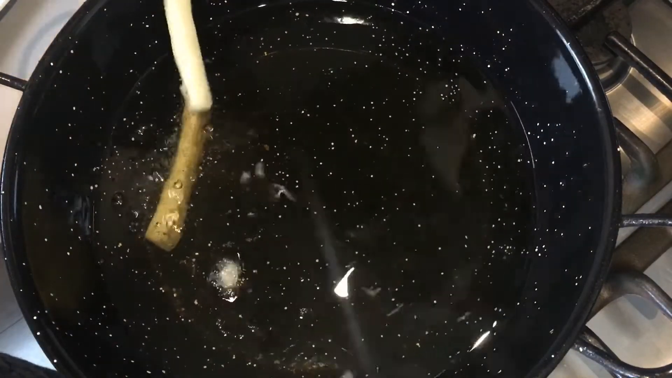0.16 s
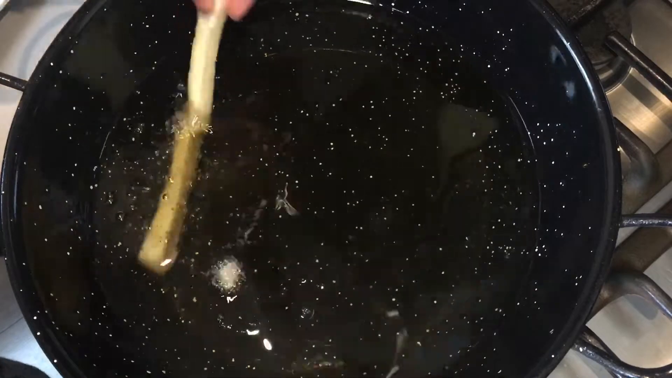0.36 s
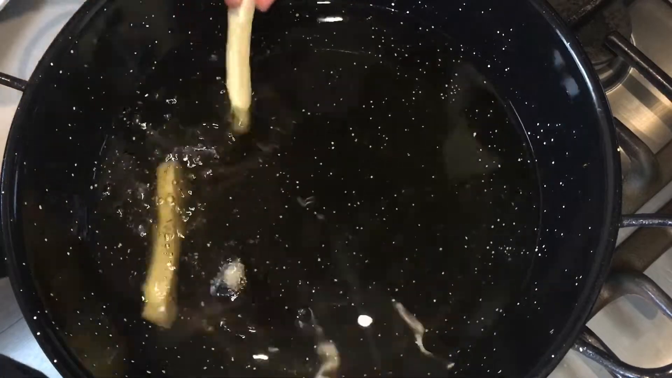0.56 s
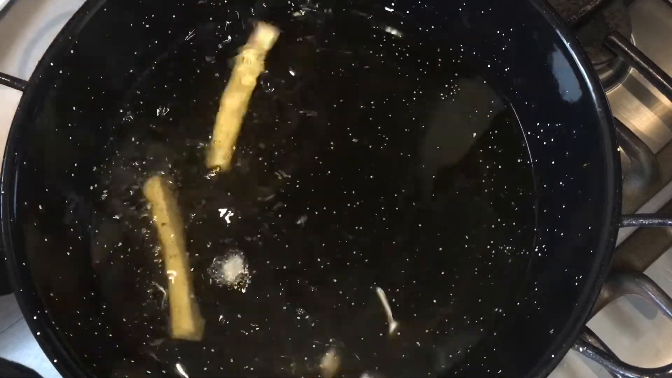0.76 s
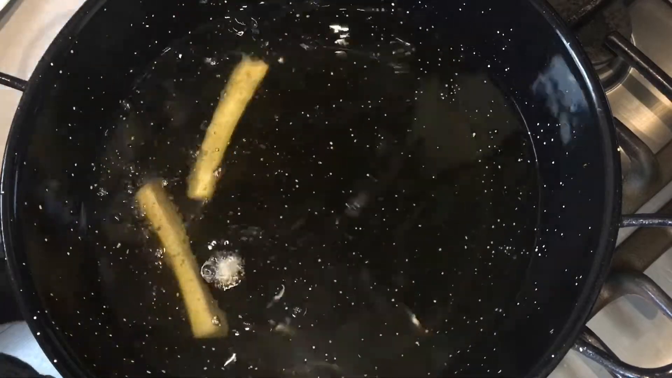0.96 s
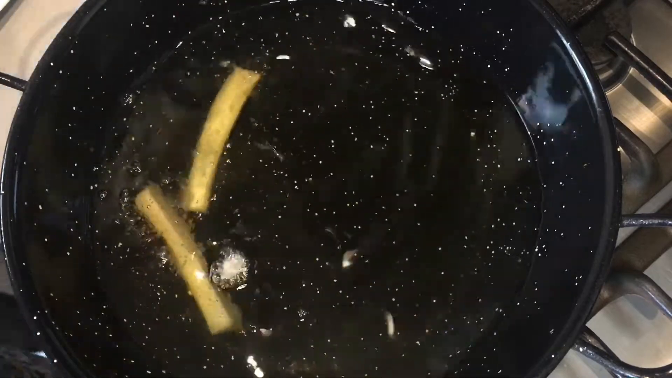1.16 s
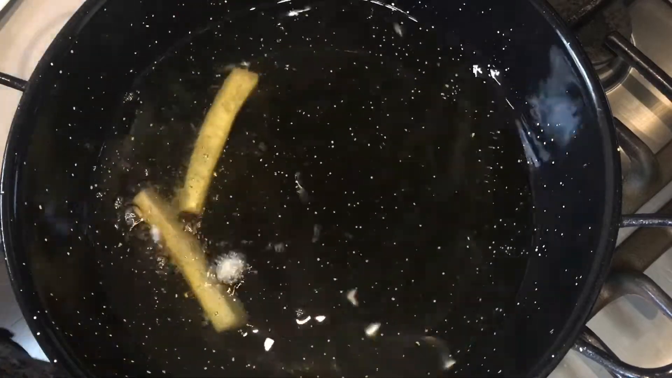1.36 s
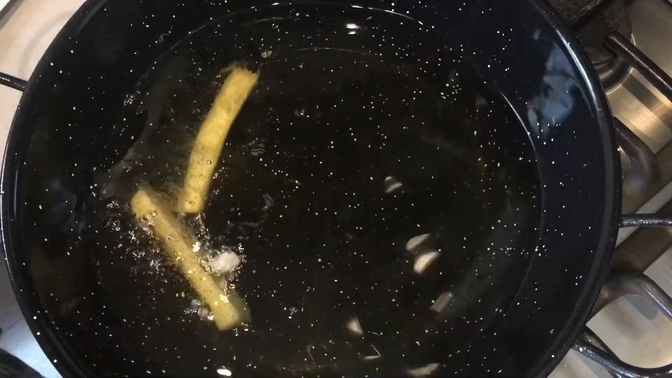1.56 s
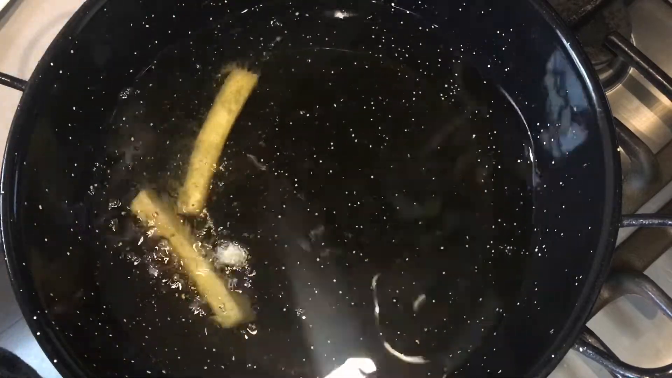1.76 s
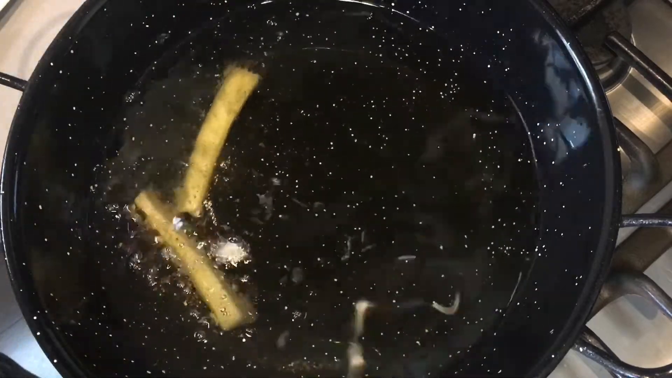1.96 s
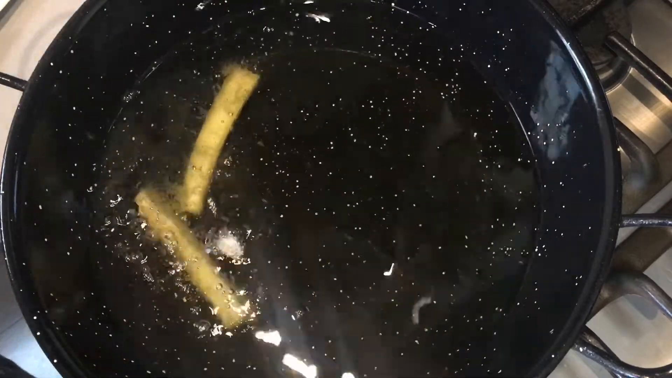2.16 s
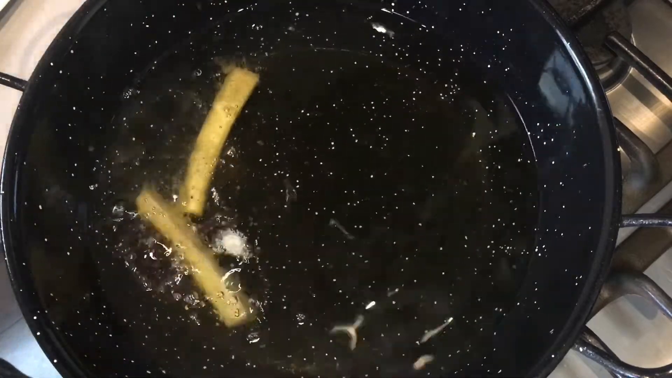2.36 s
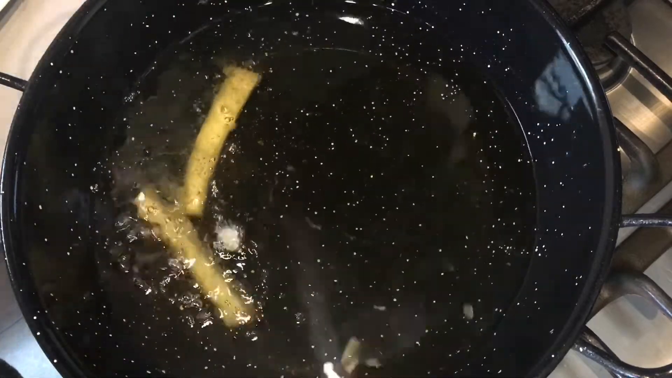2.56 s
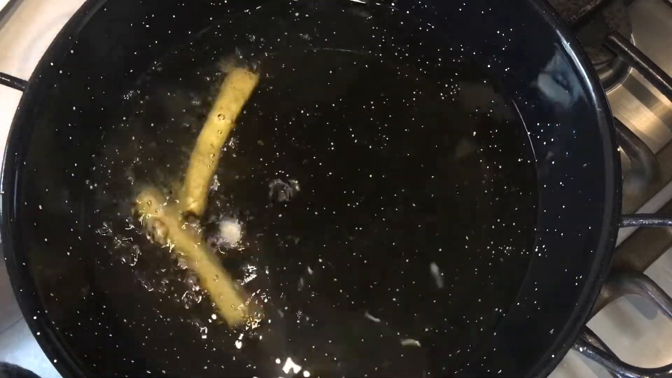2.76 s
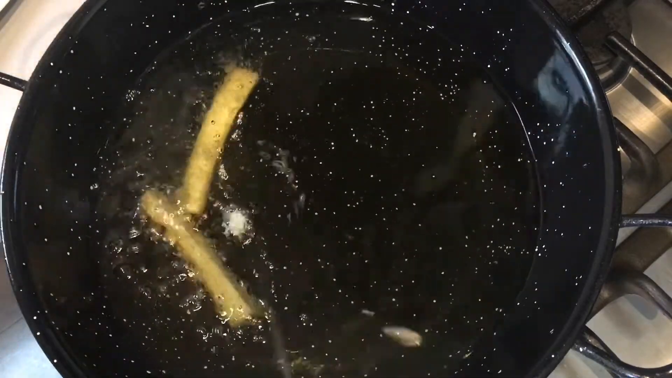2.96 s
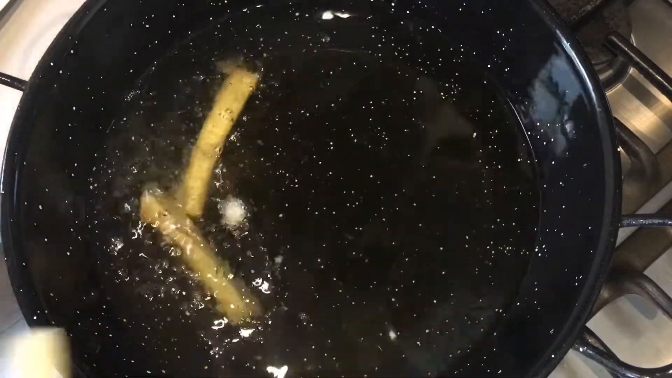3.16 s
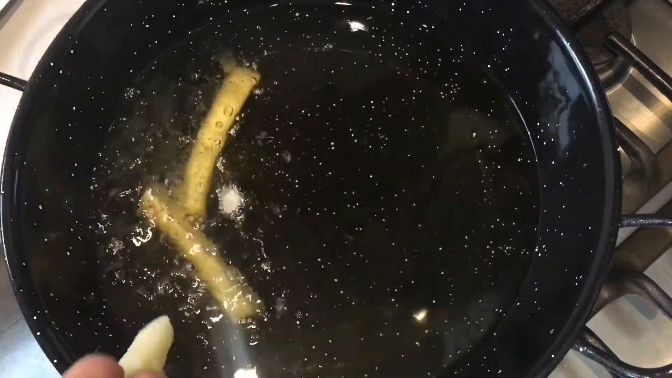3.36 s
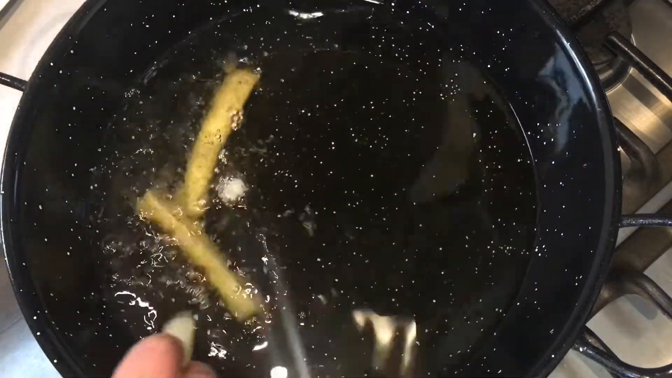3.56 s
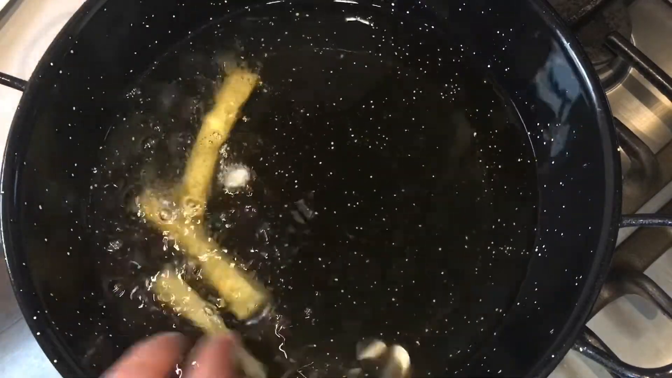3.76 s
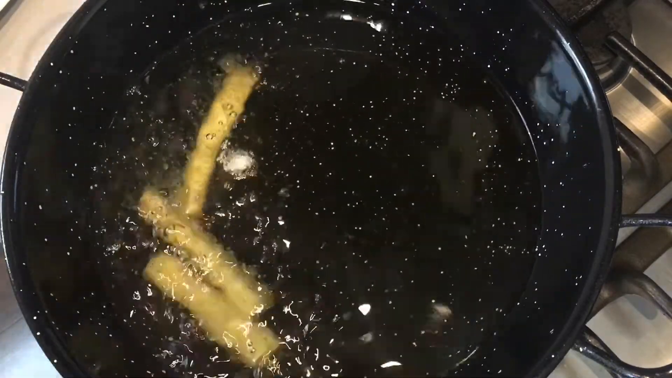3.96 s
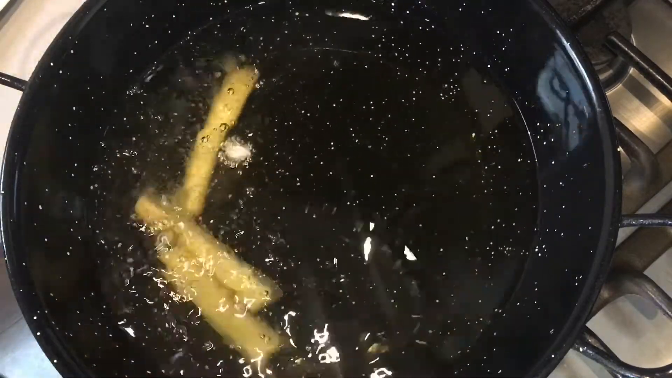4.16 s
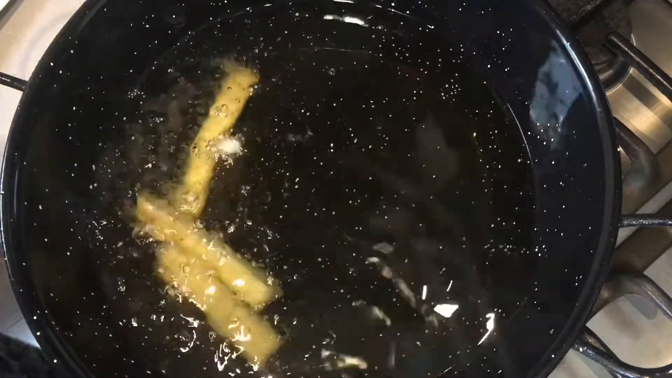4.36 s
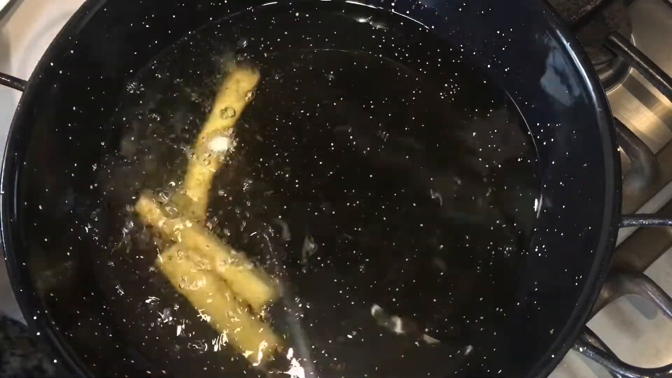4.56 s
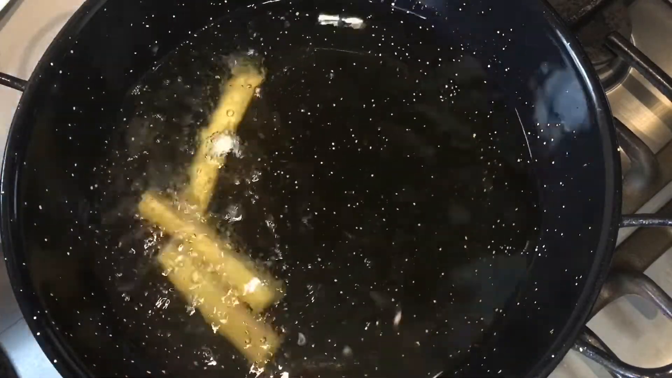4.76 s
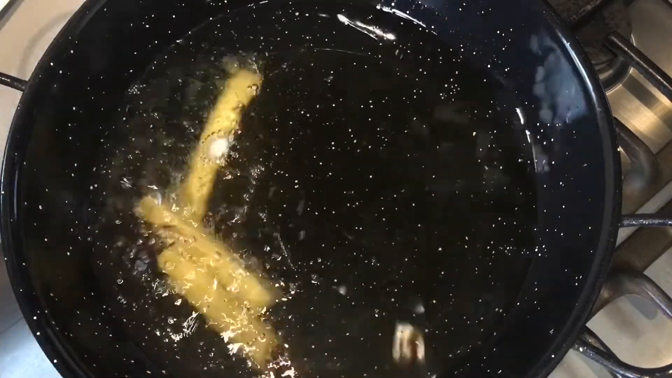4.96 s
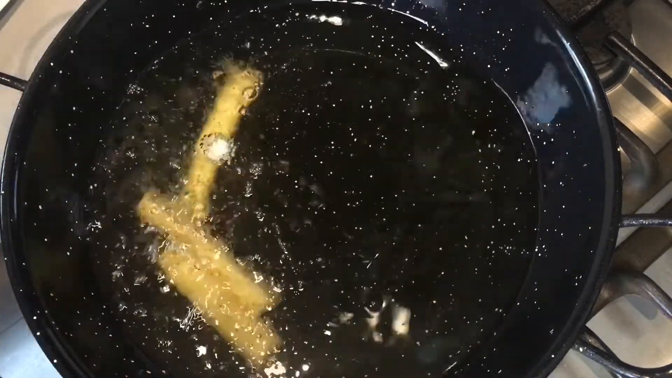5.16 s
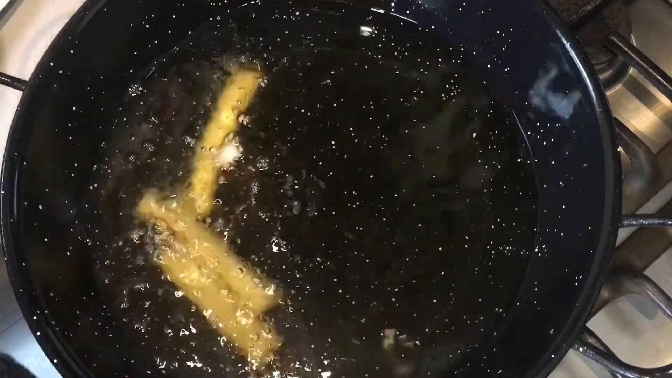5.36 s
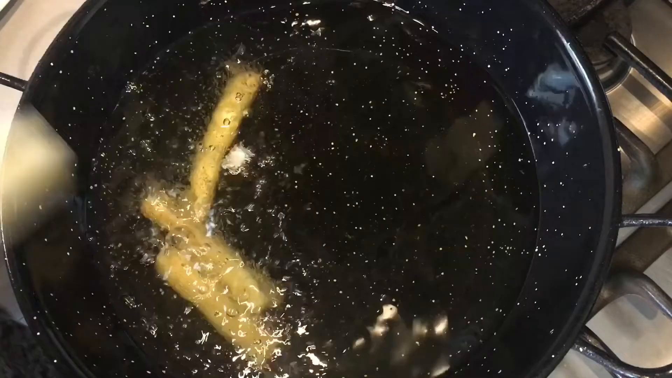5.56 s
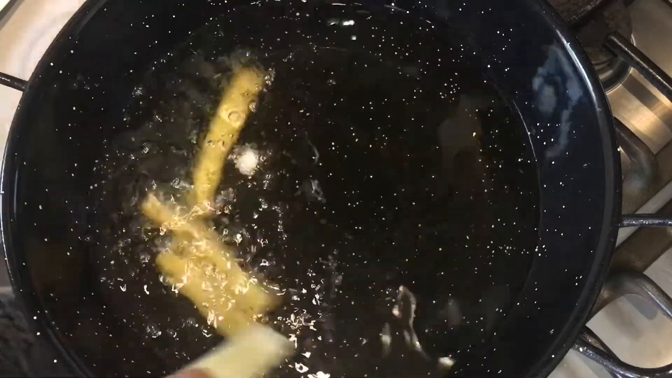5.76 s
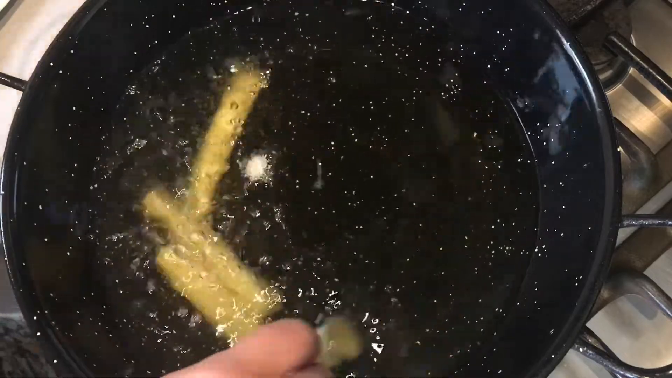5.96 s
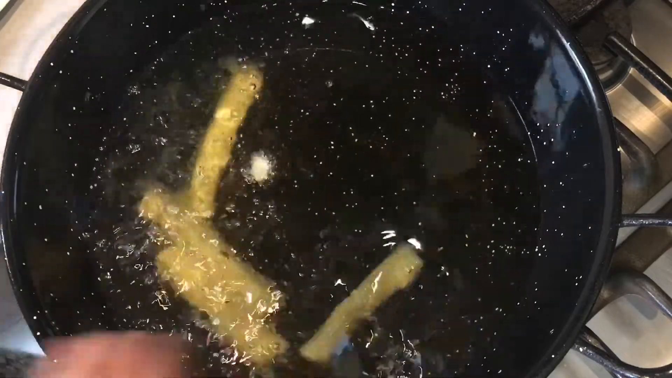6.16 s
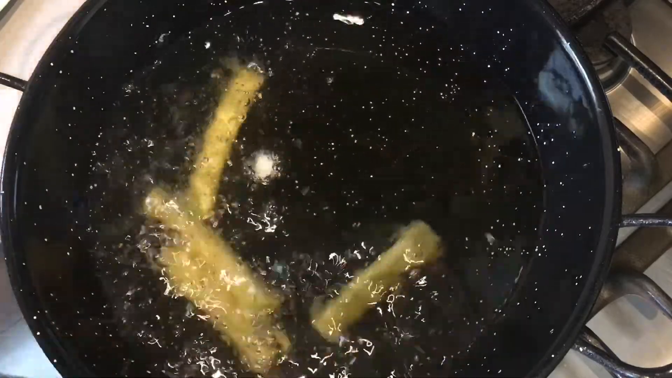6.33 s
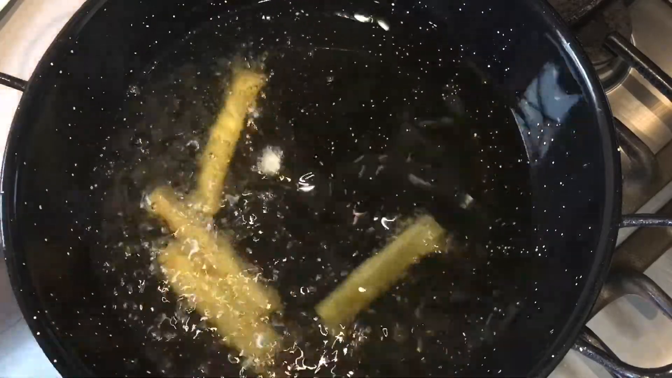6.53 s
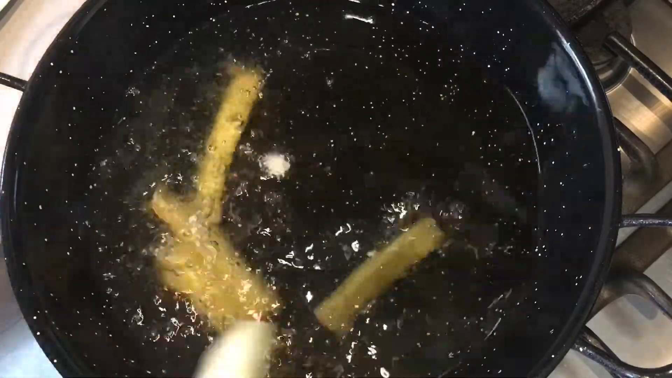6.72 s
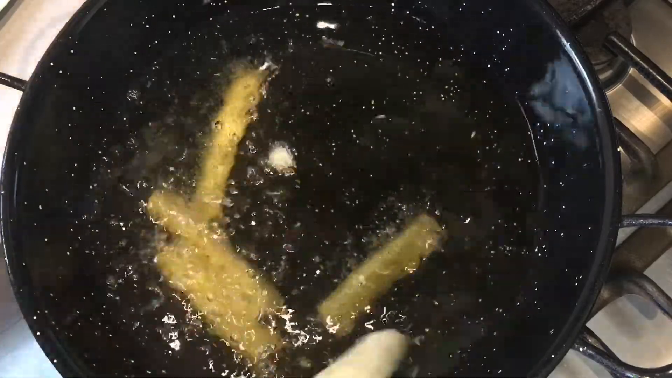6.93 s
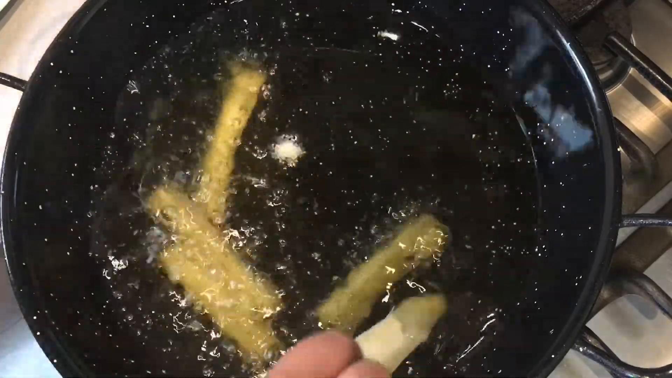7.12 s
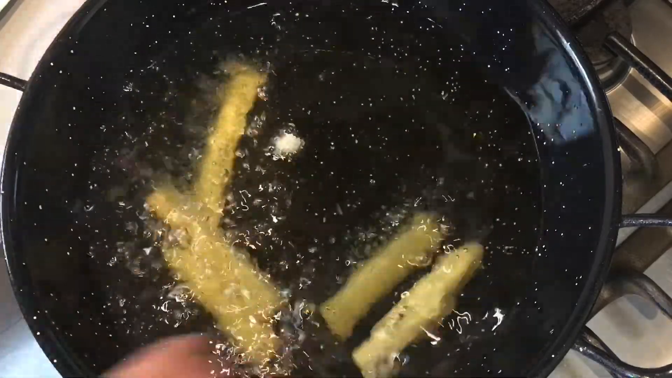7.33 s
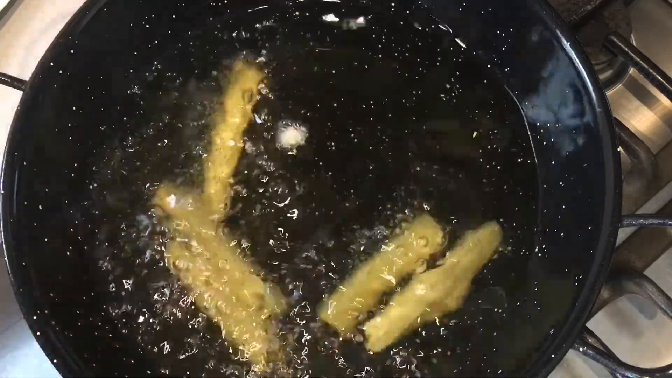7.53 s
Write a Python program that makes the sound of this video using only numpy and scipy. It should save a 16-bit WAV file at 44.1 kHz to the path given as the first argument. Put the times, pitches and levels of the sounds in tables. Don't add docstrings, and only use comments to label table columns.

```python
import sys
import numpy as np
from scipy import signal
from scipy.fft import rfft, irfft
from scipy.io import wavfile

SR = 44100
rng = np.random.default_rng(int(sys.argv[2]) if len(sys.argv) > 2 else 0)


def magnitude_from_level(level_db):
    exponent = np.asarray(level_db, float) / 20
    return 10 ** exponent


def output_pcm(signal):
    pcm = np.clip(np.atleast_2d(signal).T, -1, 1) * 32767
    wavfile.write(sys.argv[1], SR, np.round(pcm).astype(np.int16))


N = 334719

# f/Hz, level per Hz/dB
AIR_HISS = [(12, -46), (20, -31.5), (98, -1.5), (126, -12.5), (167, -20), (481, -25.5), (841, -15.5),
            (1690, -33.5), (2170, -31), (5020, -30.5), (5930, -22), (7410, -54), (8060, -29.5),
            (13700, -27), (15800, -34.5)]
# f/Hz, width/Hz, level/dB
JET_WHISTLES = [(717, 76, 8.5), (879, 117, 4), (1045, 59, 8.5), (1125.5, 60, 11.5), (1394, 147, 7),
                (2190, 160, 4.5), (3150, 620, -3.5), (3830, 160, 4.5), (4600, 200, 1), (5290, 82, -1.5),
                (6050, 154, 10), (6790, 180, -0.5), (8024, 87, 5), (9200, 85, -12), (10670, 220, -2.5),
                (11600, 170, -1), (13840, 350, -1)]
# f/Hz, width/Hz, level/dB
FLAME_WHISTLES = [(836, 50, -61), (919, 35, -60.5)]
# t/s, level/dB
FLAME_SWELL = [
    (0, -1),
    (2.1, -4),
    (2.6, 1.5),
    (3.0, 3),
    (4.3, 2.5),
    (4.7, -1.5),
    (5.7, -3),
    (6.0, 0.5),
    (7.59, 4.5),
]
# f/Hz, width/Hz, level/dB
PAN_MODES = [(3240, 120, 0), (3963, 47, 1.5), (4560, 170, -2.5), (5285, 205, 0.5), (5850, 650, -7),
             (6640, 122, 4), (8200, 150, -40), (9730, 140, -1), (11600, 430, -29), (13700, 1200, -14)]
# t/s, level/dB
SIZZLE_VIGOUR = [(0, -60), (.4, -54), (.72, -48), (.9, -50), (1.11, -42), (1.3, -47.5), (2.1, -47.5),
                 (3.78, -49), (3.9, -37.5), (4.07, -46.5), (4.5, -51), (6.0, -51), (6.07, -39), (6.29, -44),
                 (6.38, -33), (6.62, -34), (6.8, -39.5), (7.59, -43)]
# t/s, level/dB
BUBBLE_ROLL = [
    (0, -55.5),
    (4.1, -51.5),
    (5.7, -54.5),
    (6.41, -43.5),
    (6.49, -35.5),
    (6.62, -39),
    (6.98, -39.5),
    (7.25, -42),
    (7.59, -46),
]
# t/s, level/dB
DEEP_GURGLE = [
    (0, -62),
    (6.41, -60),
    (6.49, -49.5),
    (6.98, -46.5),
    (7.16, -53.5),
    (7.27, -50),
    (7.45, -50),
    (7.59, -59),
]
# t/s, level/dB, hold/s
SPRAY_FLASHES = [(.42, -56, 0.41), (0.814, -42.5, .06), (1.0, -52, 0.11), (3.797, -38.5, 0.064),
                 (6.04, -46, .05), (6.115, -34.5, .07), (6.252, -39, 0.089), (6.49, -43.5, 0.27),
                 (6.97, -47, 0.086), (7.22, -43.5, 0.22), (7.548, -42, .1)]
# t/s, peak level/dB, f/Hz, colour width/octaves
SECOND_STICK = [(.4243, -34.5, 7000, .37), (.5289, -39, 6260, .65), (.6778, -34, 5600, 1.1),
                (.7106, -36, 6800, 0.34), (.7794, -36.5, 3540, .6), (.8333, -17.5, 6310, 0.52),
                (.8335, -30.5, 4400, 0.69), (.834, -34, 11500, .8), (.9275, -32, 13220, .69),
                (.948, -35, 13500, .35), (.9542, -29, 5170, 1.5), (1.0719, -34, 6800, .31),
                (1.817, -34.5, 3380, 0.29), (1.9076, -27, 12500, .5), (2.0085, -33, 4900, 1.2),
                (2.155, -41, 12500, .8), (2.4096, -27, 14700, 0.47), (3.388, -37, 1700, 1.2),
                (3.6268, -36.5, 5970, .24)]
THIRD_STICK = [(3.7956, -34, 14090, .44), (3.8066, -32, 7600, 0.82), (3.821, -26.5, 9400, 0.37),
               (3.8217, -28, 4040, .97), (3.848, -31, 2850, 0.91), (3.8556, -26, 12500, .57),
               (3.9153, -35, 4610, .45), (3.9312, -24, 6360, 0.47), (3.9329, -28, 13870, .34),
               (3.944, -24.5, 7800, 0.5), (3.953, -27, 3840, .91), (3.964, -24, 6230, .43),
               (3.9792, -31.5, 3930, .6), (3.981, -20.5, 10100, .86), (4.005, -27.5, 3780, 1.2),
               (4.0366, -26, 9200, 0.6), (4.0908, -32, 3830, 1.2), (4.1112, -26.5, 11600, .47),
               (4.2213, -32, 11710, .41), (4.3708, -34.5, 3420, 1.2), (4.487, -35, 4670, .39),
               (4.6284, -26, 9160, 0.45), (4.629, -32, 6130, .64), (4.9696, -37, 13890, .41),
               (5.546, -31, 12270, .56), (5.8337, -39, 13080, .42)]
FOURTH_STICK = [(6.0693, -31, 13720, .55), (6.106, -20, 4400, 0.54), (6.119, -19.5, 2450, 0.51),
                (6.122, -29, 1560, 1.01), (6.1648, -26, 10700, .57), (6.2436, -22.5, 5530, 1),
                (6.2482, -27.5, 3370, .33), (6.249, -27.5, 2200, .7), (6.252, -25, 9810, 1.1),
                (6.2523, -28, 1110, 0.34), (6.2688, -24, 9240, 0.57), (6.3184, -30, 6260, .53),
                (6.343, -24, 5160, 1.01), (6.3568, -20, 7600, 0.63), (6.3765, -29, 6000, .31),
                (6.45, -14, 4970, 0.63), (6.4863, -28, 1130, 1.3), (6.5652, -29.5, 1650, .97),
                (6.606, -28, 11550, .36), (6.6223, -30, 2280, 0.97), (6.6249, -28, 6500, 0.38),
                (6.668, -32, 2940, .97), (6.6758, -24.5, 5500, .79), (6.702, -27, 9730, .57),
                (6.709, -22.5, 5200, .65), (6.7277, -10, 4560, 0.51), (6.7483, -26, 6640, .49)]
FIFTH_STICK = [(6.801, -19, 4520, 0.33), (6.8586, -17.5, 4650, 0.88), (6.948, -29, 4120, 0.33),
               (6.979, -32, 6130, .41), (7.0305, -26, 7380, 1.8), (7.031, -14.5, 3200, 0.52),
               (7.121, -31, 3360, 0.77), (7.172, -31, 9300, .42), (7.1991, -26.5, 4600, .39),
               (7.215, -33, 13400, .39), (7.24, -25.5, 5500, 1.5), (7.2396, -31, 1790, 0.37),
               (7.2622, -29, 6760, .49), (7.29, -29, 5870, .71), (7.318, -28.5, 6600, 0.52),
               (7.402, -31, 8950, 0.66), (7.4056, -25.5, 1470, 0.89), (7.4983, -25.5, 9460, .31),
               (7.498, -23, 4870, .25), (7.512, -16.5, 4880, .71), (7.5778, -29, 13200, .26),
               (7.5805, -23.5, 6000, .94)]
# t/s, peak level/dB, f/Hz, colour width/octaves
MORE_BURSTS = [(.5335, -39, 9500, .6), (.8105, -38, 9350, .37), (1.0726, -41, 13680, .49), (2.05, -37, 3800, .35),
               (4.0209, -35, 12970, .56), (4.284, -34.5, 4200, 2.1), (4.6896, -40, 13910, .6),
               (5.648, -40, 7500, 1.2), (6.003, -36, 8700, .35), (6.056, -27, 3300, .3), (6.18, -31, 4760, .46),
               (6.7012, -35, 3240, .34), (6.896, -37, 1980, 1.1), (6.961, -36, 1940, .72),
               (6.987, -34, 4560, .52), (7.193, -35, 6050, .42), (7.2893, -37, 3310, .41)]
# t/s, peak level/dB, f/Hz, colour width/octaves
SPURTS = [(.419, -33.5, 4450, .75), (.6825, -38.5, 3400, .32), (.908, -29.5, 5850, 0.62),
          (.9988, -35.5, 4700, 0.44), (1.018, -31, 6600, .89), (3.384, -35, 3210, 0.8),
          (3.8071, -27, 12180, 1.01), (3.825, -25, 13500, .45), (3.834, -29, 4400, .42),
          (4.8047, -43, 3630, 0.36), (6.0523, -20, 4500, 0.83), (6.141, -19.5, 6400, 0.43),
          (6.188, -20, 7940, .79), (6.336, -25, 4970, 0.88), (6.4084, -22, 4360, 1.1),
          (6.4103, -25, 12180, .85), (6.5004, -23, 4670, 0.55), (6.5438, -29, 1120, 1),
          (6.5518, -21, 5470, 0.6), (6.79, -22, 2140, 1.9), (6.8278, -29, 9310, 1.4),
          (7.14, -30, 11670, .47)]
# t/s, peak level/dB, f/Hz, colour width/octaves
HEAVES = [
    (.72, -45, 300, 0.47),
    (2.31, -48, 249, 0.39),
    (4.36, -48, 238, 0.25),
]
# t/s, peak level/dB, f/Hz, colour width/octaves
SPITS = [(1.0445, -32, 7600, 0.65), (1.0964, -31, 5830, .61), (3.8335, -25.5, 7540, .68),
         (3.8864, -27, 6310, .59), (6.0845, -19, 7100, 0.83), (6.112, -16.5, 4800, 0.87),
         (6.4871, -25, 3500, 0.39), (7.0314, -20, 5200, 0.57), (7.3568, -21.5, 5180, .76),
         (6.2, -26, 8500, .8), (6.093, -20, 6600, .6), (3.896, -25, 6200, .5), (3.918, -33, 4600, 0.27),
         (.843, -25.5, 6300, 0.56), (6.124, -21, 6300, 0.54), (4.124, -38, 3900, 1.2),
         (6.868, -28, 4670, .4), (6.7345, -16, 4600, 0.68), (1.125, -37, 5500, .9)]
# t/s, peak level/dB, f/Hz
SKIN_CRACKS = [(0.438, -31, 10600), (0.5312, -33, 9920), (0.5815, -37.9, 10440), (0.8338, -20.1, 6040),
               (0.8581, -33.1, 10330), (0.9305, -31.5, 13320), (0.9546, -27.6, 5200), (0.9561, -29.6, 5340),
               (1.0234, -27.1, 5610), (1.0973, -28.2, 5880), (1.2061, -35.7, 5320), (1.699, -40, 5080),
               (1.9083, -24.5, 12910), (2.1544, -35.6, 12120), (2.4102, -28.1, 14530),
               (3.7812, -35.9, 12700), (3.7936, -36.1, 12360), (3.8076, -26.9, 9220),
               (3.8155, -25.7, 13600), (3.8224, -24.1, 10690), (3.9324, -23.5, 6070), (3.9371, -26.4, 9670),
               (3.9445, -24.5, 8780), (3.9828, -20.1, 10850), (3.9844, -21.8, 10230), (4.0468, -31.0, 9510),
               (4.2226, -33.2, 11600), (4.69, -32.6, 12740), (6.2447, -20, 4850), (6.253, -27.6, 11070),
               (6.2546, -25.9, 10950), (6.3206, -26.3, 6010), (6.3576, -24.9, 9150), (6.6077, -24.3, 11550),
               (6.7048, -27.9, 9720), (6.7297, -12.7, 4300), (6.7922, -25, 4190), (6.8286, -32.6, 11840),
               (6.8618, -19, 4720), (6.8994, -31, 3760), (7.0329, -27.2, 9920), (7.1745, -29.0, 9970),
               (7.2016, -33.8, 11100), (7.202, -24.5, 4550), (7.2908, -28.6, 4470), (7.4065, -27, 4470),
               (7.4133, -31.4, 10760), (7.5001, -23.5, 9740), (7.5005, -22.1, 4800), (7.579, -28.5, 13010),
               (7.5827, -25, 5760)]


def rms_one(x):
    return x / np.sqrt(np.mean(x ** 2) + 1e-20)


def along(rows):
    s, db = np.transpose(rows)
    return np.interp(np.arange(N) / SR, s, db)


def drift(rate):
    every = 40
    r = np.exp(-2 * every * np.pi * rate / SR)
    noise = rng.standard_normal(N // every + 2002)
    slow = signal.lfilter([1], [1, -2 * r, r * r], noise)[2000:]
    return np.interp(np.arange(N) / every, np.arange(len(slow)), rms_one(slow))


def resonance(x, hz, width_hz):
    r = np.exp(-np.pi * width_hz / SR)
    poles = [1, -2 * r * np.cos(2 * np.pi * hz / SR), r * r]
    return signal.lfilter([(1 - r * r) / 2, 0, (r * r - 1) / 2], poles, x)


def resonances(x, peaks):
    return sum((-1) ** k * magnitude_from_level(db) * resonance(x, hz, width)
               for k, (hz, width, db) in enumerate(peaks))


def band(x, low_hz, high_hz, order=2):
    edges = [low_hz, min(high_hz, .45 * SR)]
    return signal.sosfilt(signal.butter(order, edges, "band", fs=SR, output="sos"), x)


def burner():
    hz, db = np.transpose(AIR_HISS)
    bins = np.fft.rfftfreq(N, 1 / SR) + 1
    colour = magnitude_from_level(np.interp(np.log(bins), np.log(hz), db))
    smooth = irfft(rfft(rng.standard_normal(N)) * colour, N)
    white = rng.standard_normal(N)
    whistles = 0
    for hz, width, db in JET_WHISTLES:
        whistle = resonance(resonance(white, hz, 1.17 * width), hz, 1.2 * width)
        whistles = whistles + magnitude_from_level(db + 1.3 * drift(4.0)) * whistle
    return magnitude_from_level(-48.5) * rms_one(smooth) + magnitude_from_level(-49) * rms_one(whistles)


def flame():
    white = rng.standard_normal(N)
    whistles = sum(magnitude_from_level(db) * rms_one(resonance(resonance(white, hz, width), hz, width))
                   for hz, width, db in FLAME_WHISTLES)
    return magnitude_from_level(along(FLAME_SWELL)) * whistles


def extractor():
    motor_hz, duct_hz, duct_width_hz = 100.3, 63.9, 7.4
    hum = np.sqrt(2) * np.sin(2 * np.pi * motor_hz * np.arange(N) / SR)
    boom = resonance(rng.standard_normal(N), duct_hz, duct_width_hz)
    boom = resonance(boom, duct_hz, duct_width_hz)
    return magnitude_from_level(-45) * hum + magnitude_from_level(-54) * rms_one(boom)


def pan(x):
    return magnitude_from_level(-9) * x + resonances(x, PAN_MODES)


def grains(low_hz, high_hz, per_s, uneven_db, cycles, clump_db, count=14):
    sizes = magnitude_from_level(uneven_db * np.minimum(rng.exponential(1, N), 5)) * rng.choice([-1, 1], N)
    born = rng.random(N) < per_s / SR
    dealt = rng.integers(0, count, N)
    out = 0
    for k, hz in enumerate(np.geomspace(low_hz, high_hz, count)):
        if k % 3 == 0:
            clump = magnitude_from_level(clump_db * drift(33.0))
        clicks = sizes * born * (dealt == k) + 1e-18
        out = out + clump * rms_one(resonance(clicks, hz, 2.6 * hz / cycles))
    return rms_one(out)


def flashes():
    attack_s, fade_db_per_s = 0.01, 150
    t = np.arange(N) / SR
    power = 0
    for s, db, hold in SPRAY_FLASHES:
        rise = np.clip((t - s) / attack_s, 0, 1)
        fade_db = fade_db_per_s * np.maximum(t - s - hold, 0)
        power = power + (rise * magnitude_from_level(db - fade_db)) ** 2
    return np.sqrt(power)


def boil():
    vigour_db = along(SIZZLE_VIGOUR)
    bubbling = magnitude_from_level(along(BUBBLE_ROLL) - 5.0)
    gurgle = magnitude_from_level(along(DEEP_GURGLE) - 4.5)
    sizzle = magnitude_from_level(vigour_db - 4.5)
    steady = magnitude_from_level(-55.5 + 0.48 * (vigour_db + 48.5) + 1.5 * drift(1.5))
    spray = magnitude_from_level(-4.5) * np.hypot(steady, flashes())
    deep = gurgle * grains(253.7, 378, per_s=400, uneven_db=3.5, cycles=29, clump_db=-0.5, count=6)
    middle = bubbling * grains(690, 2140, per_s=2500, uneven_db=2.5, cycles=3.7, clump_db=2.5)
    fizz = grains(3250, 6960, per_s=6500, uneven_db=3.0, cycles=11.0, clump_db=2.5)
    mist = grains(8400, 14500, per_s=5000, uneven_db=3.5, cycles=9.9, clump_db=3.0)
    fizz = fizz + magnitude_from_level(-9.0) * grains(2450, 9600, per_s=260, uneven_db=2.0, cycles=13, clump_db=-1.0)
    mist = mist + magnitude_from_level(-12) * grains(6450, 15300, per_s=300, uneven_db=4.0, cycles=32.0, clump_db=1.0)
    return deep + middle + sizzle * rms_one(pan(fizz)) + spray * rms_one(pan(mist))


def bursts():
    sudden = SECOND_STICK + THIRD_STICK + FOURTH_STICK + FIFTH_STICK + MORE_BURSTS
    # events, swell/ms, echo t60/s
    kinds = [(sudden, 1.4, 0.079), (SPURTS, 7.2, 0.1), (HEAVES, 42, .25), (SPITS, 1.2, .17)]
    rows = []
    for events, swell_ms, t60 in kinds:
        for s, db, hz, octaves in events:
            swell = swell_ms * np.clip(hz / 6000, 1, 3) ** -0.64
            echo = t60 + .0004 * (db + 34)
            rows.append((s, db, hz, octaves, swell, echo))
    return rows


def pops(size=5000):
    direct_ms, echo_share = 3.4, 0.68
    rows, t, out = bursts(), np.arange(size) / SR, np.zeros(N + size)
    for s, peak_db, hz, octaves, swell_ms, t60 in rows:
        noise = rng.standard_normal(size)
        lump = rng.standard_normal(size // 50 + 1)
        swell = max(swell_ms, .1) / 1000
        after = np.maximum(t - swell, 0)
        burst = np.minimum(t / swell, 1) ** 0.25 * magnitude_from_level(-60 * after / max(t60, .01))
        direct = np.exp(-(1000 * after / direct_ms) ** 2)
        burst = burst * (echo_share + (1 - echo_share) * direct)
        burst = burst * magnitude_from_level(2.4 * np.interp(np.arange(size) / 50, np.arange(len(lump)), lump))
        wide = 2 ** np.clip(octaves / 2, .05, 1.5)
        body = rms_one(band(noise * burst, hz / wide, hz * wide))
        splash = rms_one(band(noise * burst ** 2, hz / 1.9, hz * 1.95))
        ring = np.sin(2 * np.pi * hz * t) * (t / .0012) * np.exp(-t / 0.00072)
        snap_db = 3 - 1.4 * swell_ms - 5.5 * octaves
        snap = magnitude_from_level(snap_db) * np.abs(body).max() * ring / ring.max()
        pop = pan(body + magnitude_from_level(-7.0) * splash + snap)
        at = round(s * SR)
        out[at:at + size] += magnitude_from_level(peak_db) * pop / np.abs(pop).max()
    return out[:N]


def cracks():
    cycles = 2.9
    out, t = np.zeros(N + 128), np.arange(-64, 64) / SR
    for s, peak_db, hz in SKIN_CRACKS:
        phase = rng.uniform(0, 2 * np.pi)
        at = round(s * SR) - 64
        shape = np.exp(-(2 * t * hz / cycles) ** 2)
        out[at:at + 128] += magnitude_from_level(peak_db - 2.5) * shape * np.sin(2 * np.pi * hz * t + phase)
    clicks = out[:N]
    return clicks + magnitude_from_level(-6.0) * resonances(clicks + 1e-18, PAN_MODES)


def kitchen(x):
    t60_s, onset_s = 0.31, 0.0052
    t = np.arange(SR // 2) / SR
    tail = rng.standard_normal(len(t)) * magnitude_from_level(-60 * t / t60_s) * np.minimum(t / onset_s, 1)
    tail = band(tail, 120, 12000, order=1)
    return magnitude_from_level(-10.5) * signal.fftconvolve(x, tail / np.linalg.norm(tail))[:N]


def scene():
    frying = boil() + pops() + cracks()
    mono = burner() + flame() + extractor() + frying + kitchen(frying)
    return np.array([mono, mono])


def band_limit(x):
    return signal.sosfilt(signal.butter(12, 16480, fs=SR, output="sos"), x)


def record(dry):
    low_pass = signal.ellip(14, .5, 60, 15730, fs=SR, output="sos")
    mix = signal.sosfilt(low_pass, dry)
    return band_limit(mix)


dry = scene()
out = record(dry)
output_pcm(out)
```